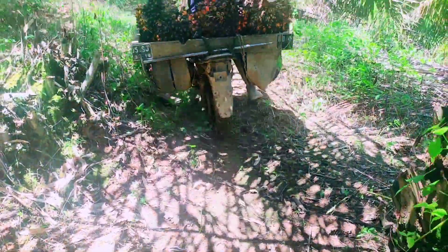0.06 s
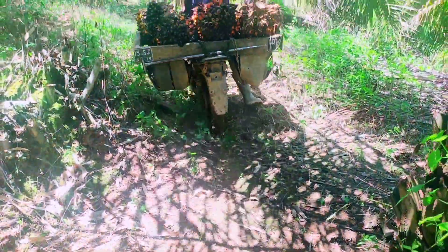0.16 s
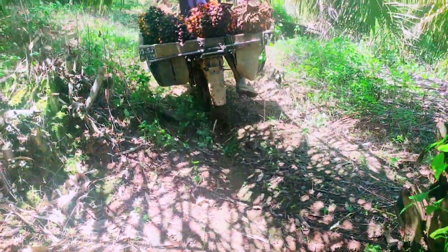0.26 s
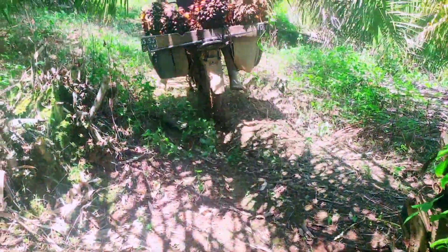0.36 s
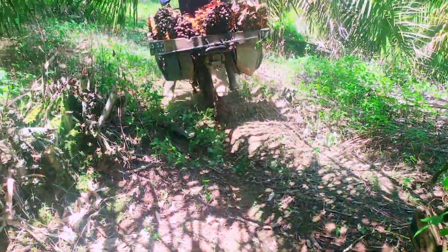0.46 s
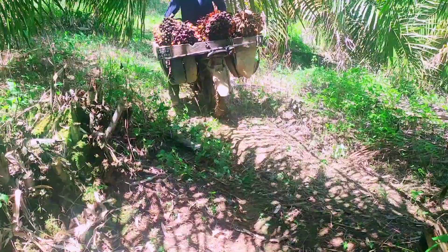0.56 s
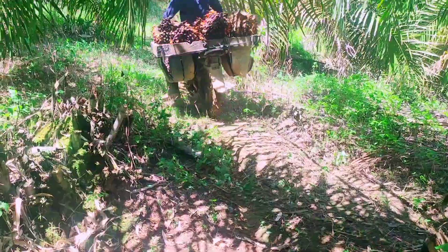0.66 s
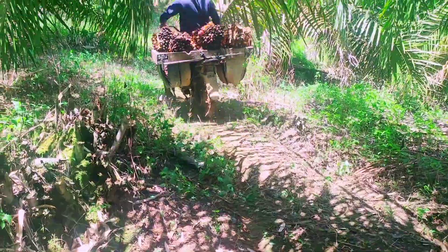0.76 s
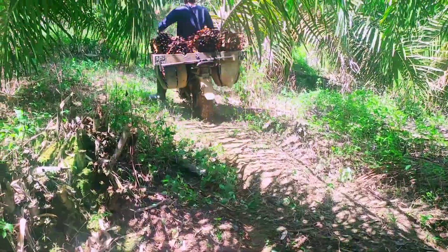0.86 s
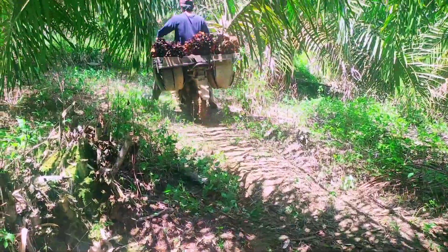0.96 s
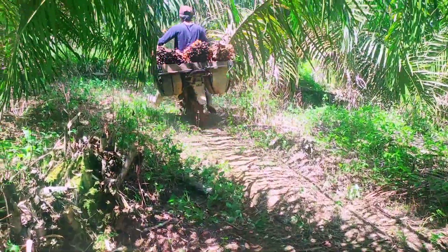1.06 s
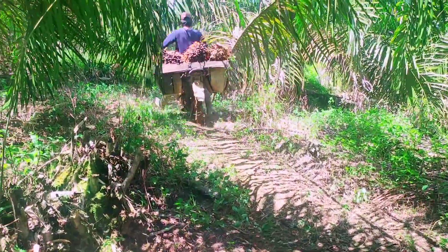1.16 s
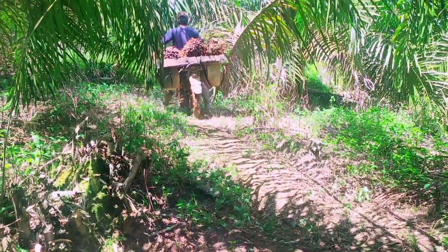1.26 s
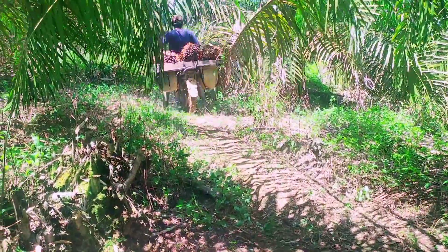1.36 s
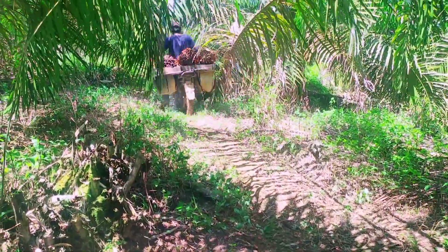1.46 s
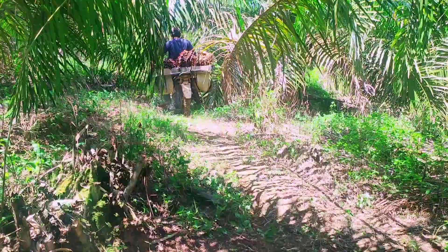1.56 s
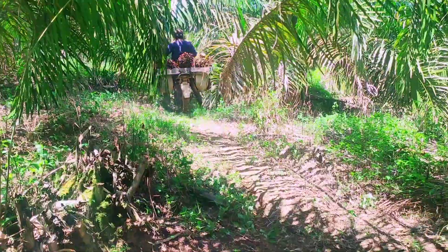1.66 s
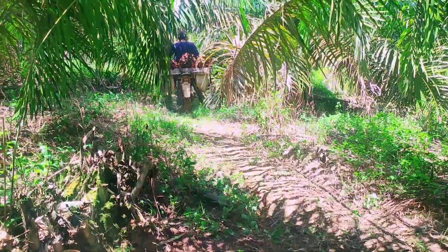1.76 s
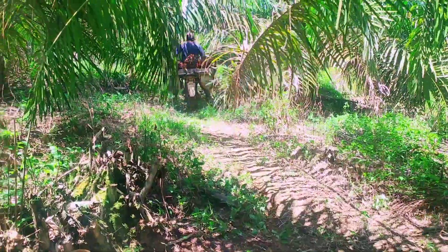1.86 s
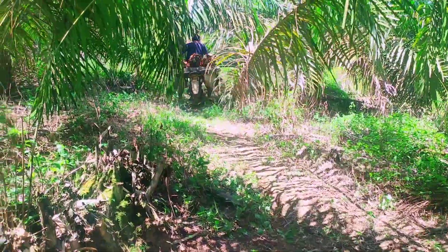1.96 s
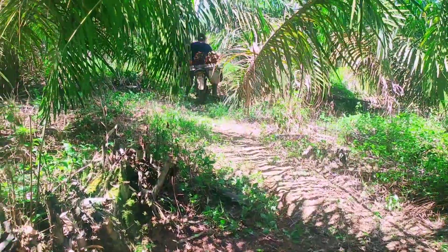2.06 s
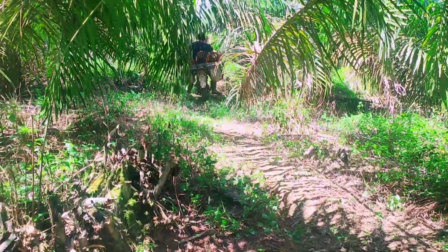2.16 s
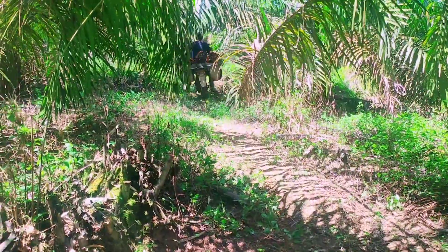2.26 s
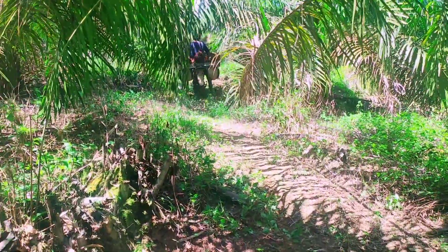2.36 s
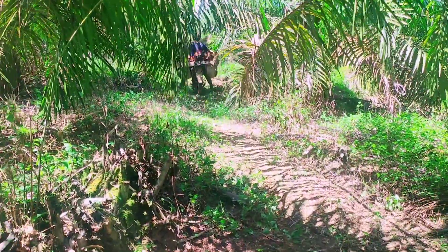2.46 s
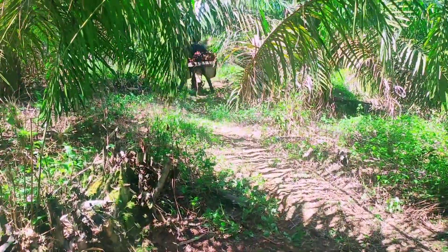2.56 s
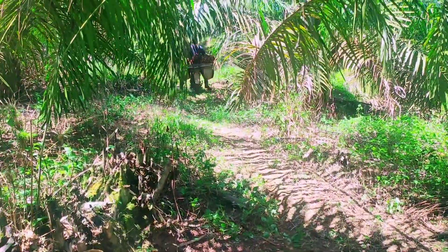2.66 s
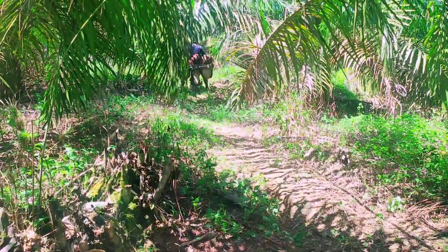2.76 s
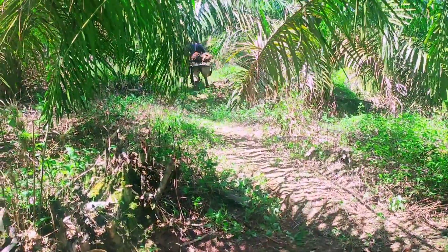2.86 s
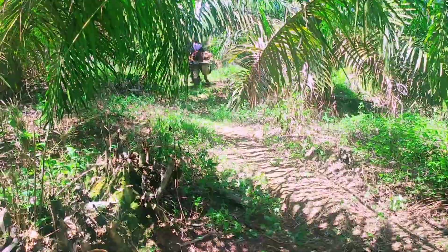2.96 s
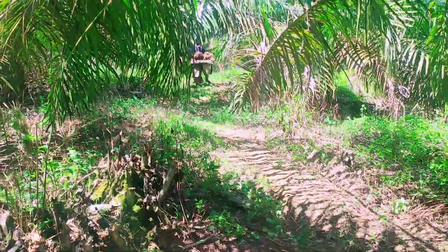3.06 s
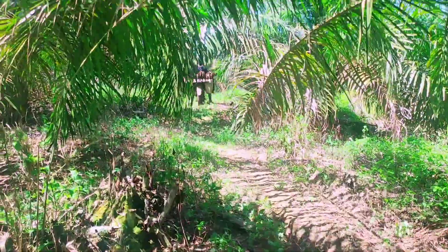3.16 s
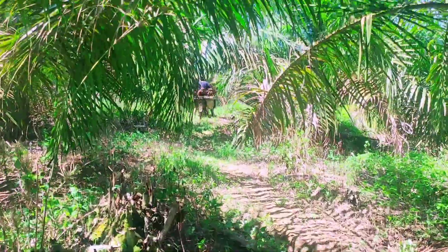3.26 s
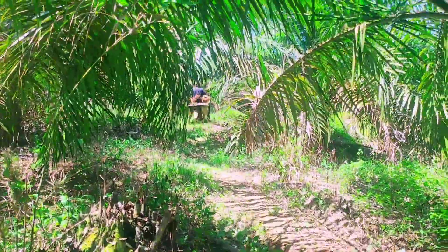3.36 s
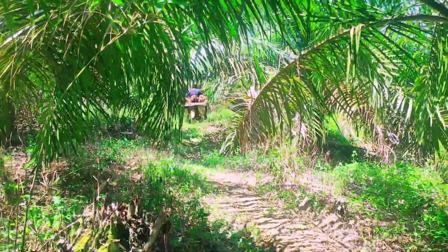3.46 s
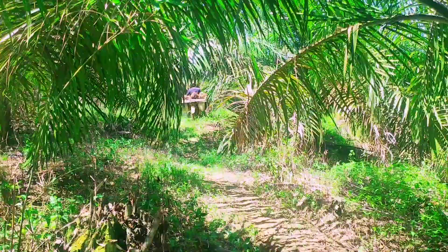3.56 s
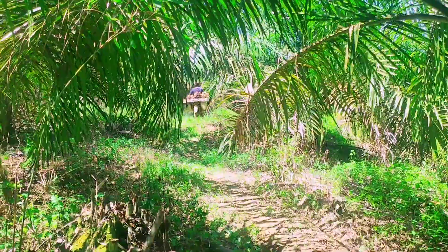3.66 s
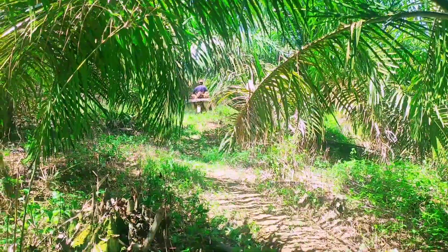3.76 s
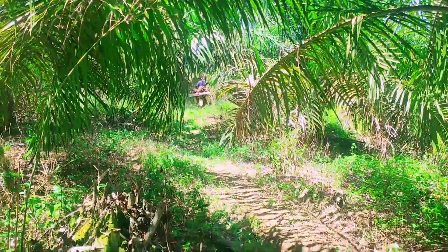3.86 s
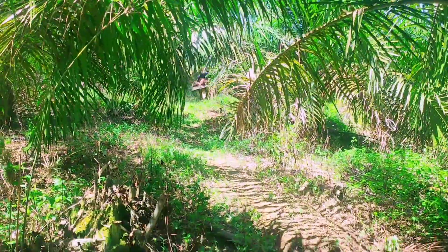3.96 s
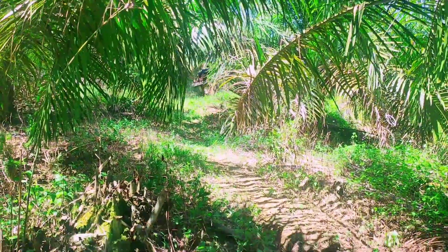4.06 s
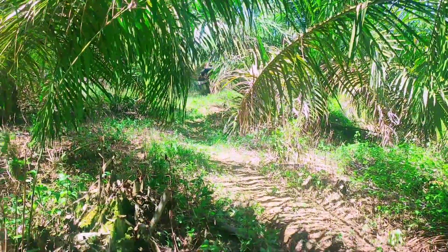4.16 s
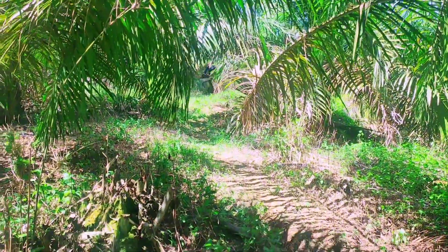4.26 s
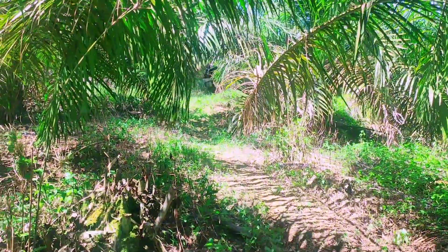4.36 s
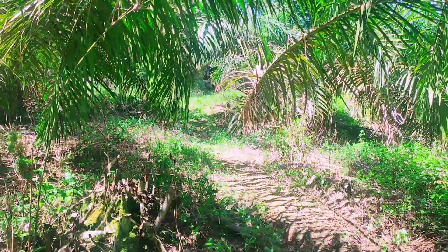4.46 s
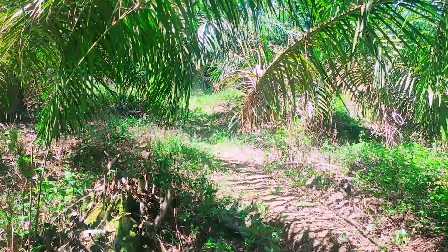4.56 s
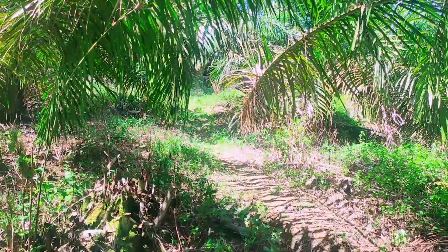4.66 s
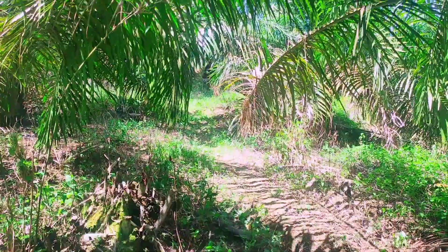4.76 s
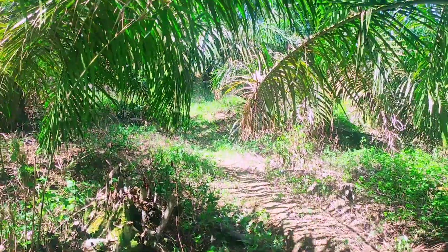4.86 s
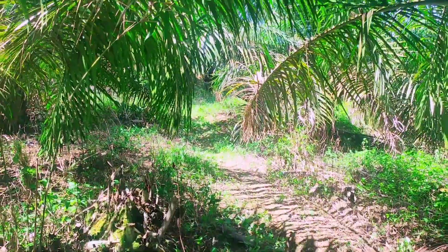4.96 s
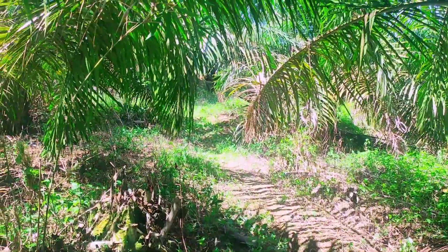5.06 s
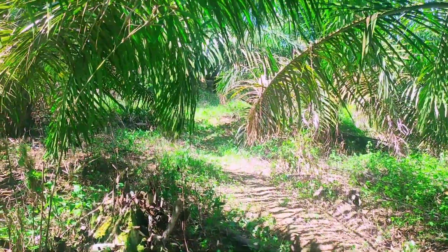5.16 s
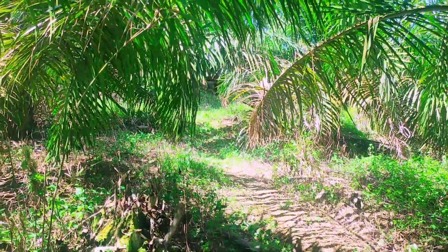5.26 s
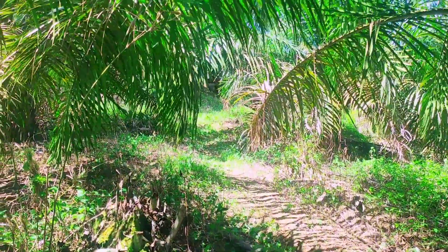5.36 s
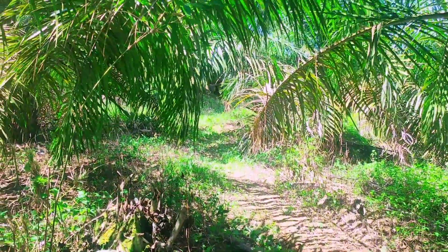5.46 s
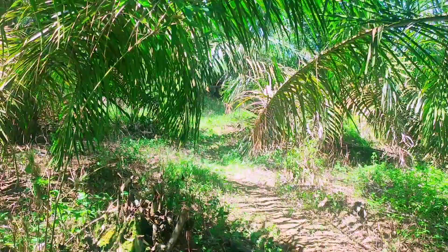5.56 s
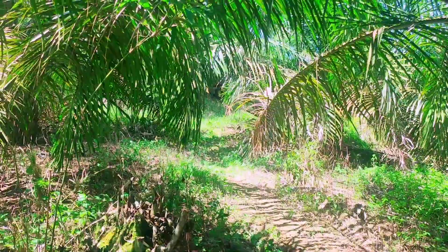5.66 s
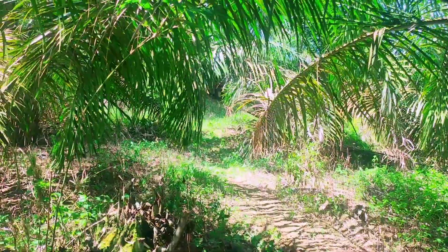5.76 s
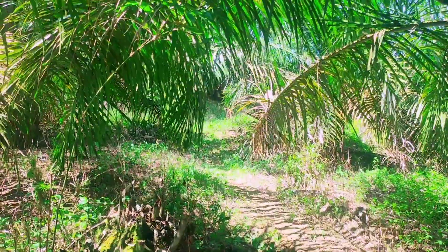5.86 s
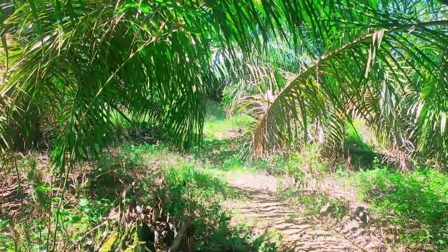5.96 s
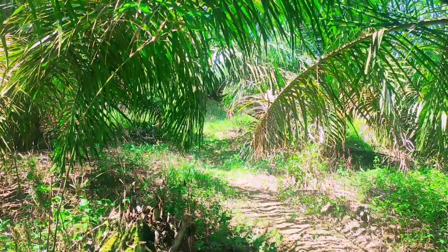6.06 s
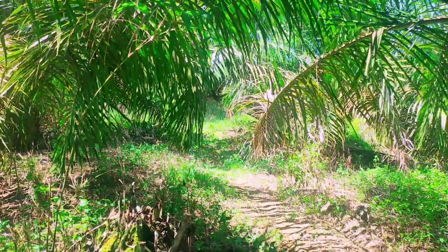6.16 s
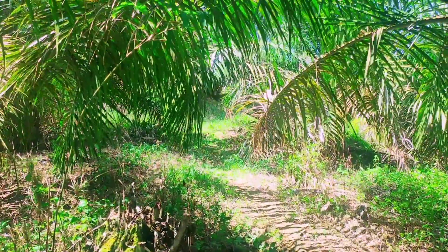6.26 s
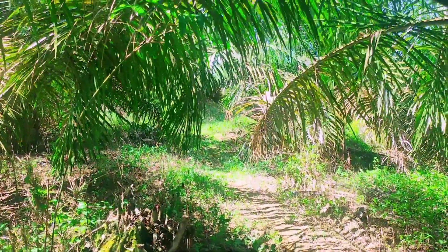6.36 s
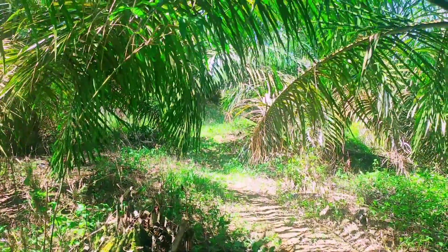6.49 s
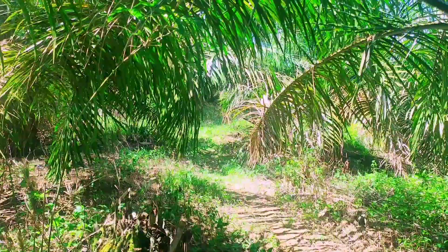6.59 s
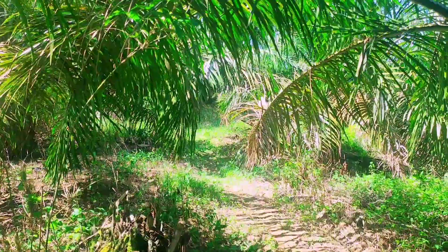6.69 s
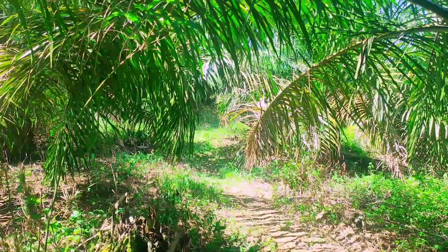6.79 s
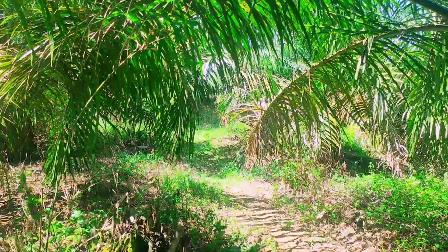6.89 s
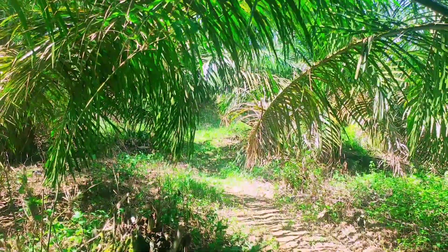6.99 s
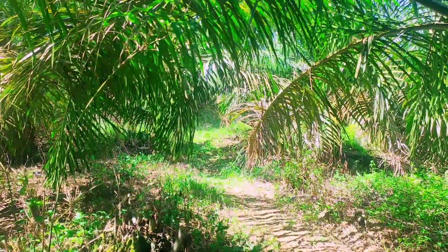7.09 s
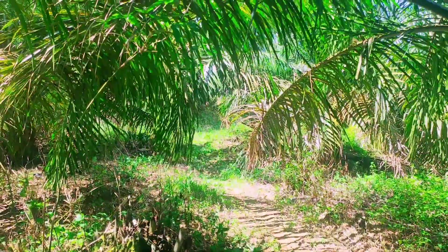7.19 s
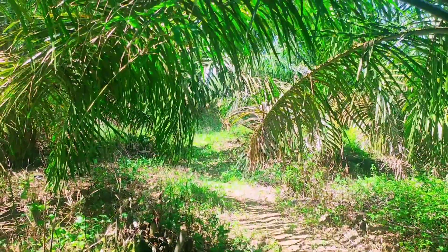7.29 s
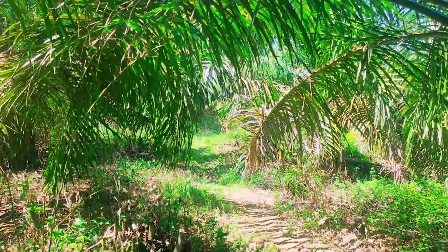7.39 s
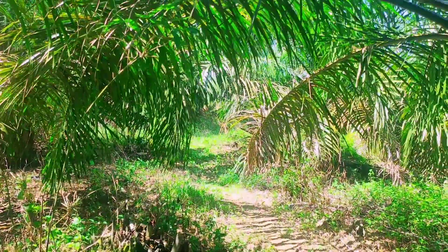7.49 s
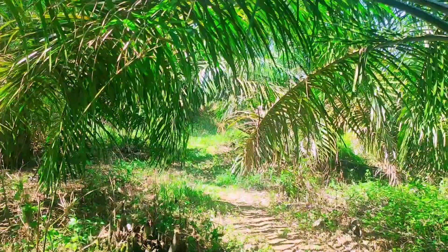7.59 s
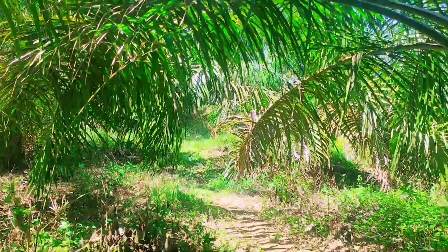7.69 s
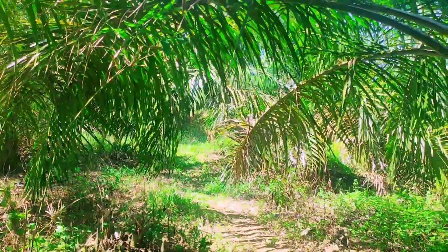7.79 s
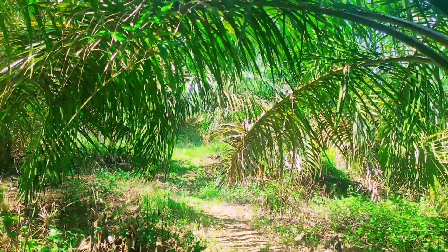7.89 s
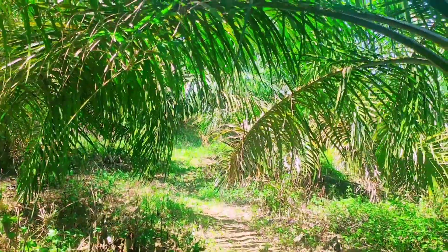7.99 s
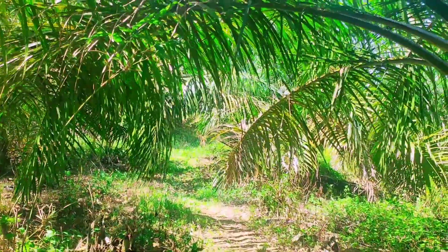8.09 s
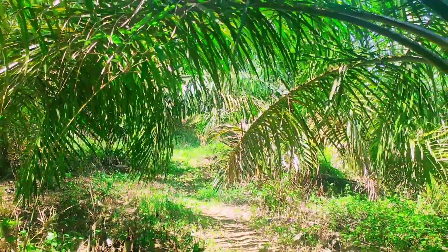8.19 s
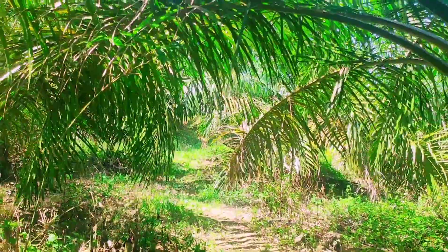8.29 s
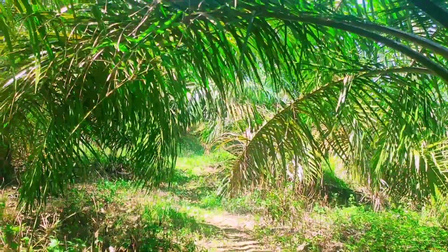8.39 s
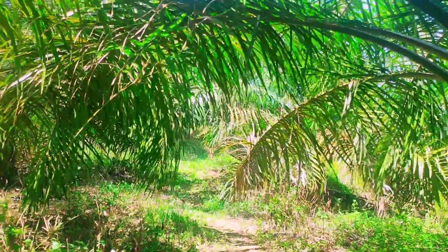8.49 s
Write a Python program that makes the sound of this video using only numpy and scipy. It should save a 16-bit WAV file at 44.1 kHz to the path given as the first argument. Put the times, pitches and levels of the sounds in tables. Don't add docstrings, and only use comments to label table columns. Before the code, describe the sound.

Outdoors on a dirt track among palms, a small, badly silenced single-cylinder petrol engine drives a loaded carrier away from a phone. From 0 to 1 second it is close and loudest: rapid, lumpy exhaust pops, roughly thirty a second, stumbling in uneven runs, with a raspy crack, spitting gas hiss and loose metallic rattle. From 1 to 2 seconds it drops back. Around 2 to 4 seconds the hollow pipe tone climbs under load, more ringing and nasal, with brief dull throttle lifts and short trunk echoes. It is weakest near 3.4 to 4.3, swells a little around 4.5 to 5, dips at 5.3, then settles into a lower, steadier putter, losing its hiss. At 7.94 a quick cluster of dull wooden knocks bumps through. By 8.5 the engine is faint but still running. Low breeze and faint frond rustle remain underneath.

```python
import sys
import numpy as np
from scipy import signal
from scipy.fft import rfft, irfft, next_fast_len
from scipy.io import wavfile
from scipy.ndimage import uniform_filter1d

SR = 44100
rng = np.random.default_rng(int(sys.argv[2]) if len(sys.argv) > 2 else 0)


def wav_record(signal):
    frames = np.transpose(np.atleast_2d(signal))
    bounded = np.clip(frames, -1, 1)
    quanta = np.round(bounded * 32767).astype(np.int16)
    wavfile.write(sys.argv[1], SR, quanta)


def natural_amplitude(level_db):
    exponent = np.asarray(level_db, float) / 20
    return 10 ** exponent


N = 376173


def evened(x):
    return x / np.sqrt(np.mean(x ** 2) + 1e-20)


def read(points, hz):
    point_hz, value = np.transpose(points)
    return np.interp(np.log(hz + 1), np.log(point_hz + 1), value)


def follow(rows, s):
    at, *columns = np.transpose(rows)
    return [np.interp(s, at, column) for column in columns]


def add(mix, s, sound):
    part = mix[round(s * SR):][:len(sound)]
    part += sound[:len(part)]


# frequency_hz, likeness
PORT_LIKENESS = [(60, 0.79), (160, 0.77), (430, 1), (1160, 0.34), (3100, 0.28), (8300, 0.01)]


def noise(colour, patchy_db, alike):
    frames, hz = N // 128 + 5, np.fft.rfftfreq(512, 1 / SR)
    a, b, c, d, patches = rng.standard_normal((frames, 257, 5)).T
    patches = uniform_filter1d(patches, size=8, axis=0)
    patches = evened(uniform_filter1d(patches, size=12, axis=1))
    same = np.clip(alike * read(PORT_LIKENESS, hz), -1, 1)[:, None]
    left, other = a + 1j * b, c + 1j * d
    z = np.array([left, same * left + np.sqrt(1 - same ** 2) * other])
    z *= natural_amplitude(read(colour, hz)[:, None] + patchy_db * patches)
    return evened(signal.istft(z, nperseg=512, noverlap=384)[1][:, :N])


# time_s, rattle_db, rasp_db
DEPARTURE = [(0.0, -43, -4.5), (0.43, -37, 3.5), (0.97, -43.5, 6), (1.64, -42.5, -0.8), (1.78, -47, -3.5),
             (2.04, -41, 1), (2.9, -41.5, -2), (3.5, -47.5, -6.5), (3.87, -50, -4), (4.59, -46, -0.5),
             (5.06, -47.5, -3), (5.2, -51.5, 0.5), (5.33, -68, 4), (5.4, -49.5, -1.5), (5.91, -49, 4.5),
             (6.7, -53, -8), (7.86, -52.5, -3), (8.53, -57.5, -0.5)]
# frequency_hz, density_db
RATTLE_COLOUR = [(290, -28), (500, -7.5), (651, -8.5), (888, -14), (1060, -19), (1290, -30), (1820, -22),
                 (4470, -29.5), (6640, -17), (7760, -22.5), (8750, -72), (11400, -104), (19200, -120)]
# frequency_hz, density_db
RUMBLE_COLOUR = [(15, -73.5), (25, -30), (59, -36), (189, 7.5), (328, -21.5), (405, -15), (648, -28),
                 (897, -31), (1200, -55.5), (1560, -66), (2640, -120)]
# frequency_hz, density_db
LEAF_COLOUR = [(760, -34), (1300, -5), (1800, -2), (3470, -14), (6560, -8.5), (7600, -20), (9880, -50),
               (16700, -120)]


def rattle():
    t = np.arange(N) / SR
    rumble = natural_amplitude(-38) * noise(RUMBLE_COLOUR, patchy_db=3.0, alike=1.18)
    fizz = noise(RATTLE_COLOUR, patchy_db=4.0, alike=1.1)
    low = signal.sosfiltfilt(signal.butter(4, 6900, fs=SR, output="sos"), fizz)
    fizz = low + natural_amplitude(3.0 - 1.02 * t) * (fizz - low)
    leaves = natural_amplitude(-71.5) * noise(LEAF_COLOUR, patchy_db=1.0, alike=0.8)
    return natural_amplitude(follow(DEPARTURE, t)[0]) * fizz + rumble + leaves


# frequency_hz, density_db
WIND_COLOUR = [(15, -1.5), (30, -4), (62, 5), (100, 6.5), (160, 0), (300, -41), (900, -110)]
# time_s, level_db
BREEZE_LEVEL = [(0, 5.5), (1.2, 1.5), (3.2, -7.5), (4.9, -2), (6, 1), (7.2, -3.5), (8.5, -5)]


def air():
    level = natural_amplitude(-47.6 + follow(BREEZE_LEVEL, np.arange(N) / SR)[0])
    return level * noise(WIND_COLOUR, patchy_db=1.5, alike=1.05)


# first_s, last_s, count, blow_db,
# sharpness_db
FIRING_RUNS = [(0.0068, 0.0239, 2, -7, -2), (0.0535, 0.0831, 2, -4, -1.5), (0.1087, 0.1661, 3, -3, 0),
               (0.2004, 0.2216, 2, -4.5, 1.5), (0.2547, 0.2873, 2, -2.5, -2.2),
               (0.3082, 0.3291, 2, -6.0, 0.7), (0.3635, 0.4048, 3, -3.5, 2.2),
               (0.4459, 0.482, 2, -4, -2), (0.5038, 0.5462, 3, -3, 0.2), (0.588, 0.6085, 2, -5.5, 6),
               (0.6431, 0.6791, 2, -6, -1.3), (0.7, 0.7345, 2, -5.5, -2),
               (0.7563, 0.7905, 2, -7.5, -0.8), (0.8293, 0.8626, 2, -8.5, 0.7),
               (0.888, 0.9193, 2, -8.5, -0.5), (0.9556, 1.0058, 3, -10.5, -2.0),
               (1.0348, 1.0564, 2, -10, 2.2), (1.1003, 1.1299, 2, -10, -1),
               (1.1682, 1.2221, 2, -9.5, -2.2), (1.2522, 1.2838, 2, -9.5, 2.3),
               (1.3035, 1.3416, 2, -8.5, 6.5), (1.3825, 1.4663, 3, -8.5, 1.7),
               (1.4985, 1.5626, 4, -9, -0.3), (1.5973, 1.6194, 2, -7.5, 4.5),
               (1.6583, 1.6893, 2, -8.5, -3), (1.7321, 1.7755, 3, -10.5, -0.6),
               (1.797, 1.8288, 2, -8.5, 0.5), (1.8696, 1.9119, 2, -13.5, -1),
               (1.966, 1.9839, 2, -12.5, 2.8), (2.0016, 2.036, 2, -12, 3),
               (2.0534, 2.0752, 2, -12, 3.5), (2.0967, 2.1313, 2, -11, -4.3),
               (2.1699, 2.1914, 2, -11, -0.5),
               (2.2235, 2.2598, 2, -10.3, 1), (2.2856, 2.3166, 2, -11, -0.8),
                 (2.358, 2.3794, 2, -10.5, -1.0), (2.401, 2.434, 2, -13, 1.7),
                 (2.4717, 2.4987, 2, -12.5, 0.1), (2.5342, 2.5595, 2, -13, -1),
                 (2.5847, 2.6707, 4, -13.5, 4.2), (2.6945, 2.7774, 4, -13.5, 0.6),
                 (2.7944, 2.852, 3, -11, 1.5), (2.8693, 2.8984, 2, -10.5, 0),
                 (2.9325, 2.9635, 2, -11, -2.5), (3.0002, 3.0267, 2, -13, -0.9),
                 (3.0575, 3.075, 2, -11.5, 7), (3.1044, 3.1394, 2, -11.5, -1),
                 (3.1638, 3.2102, 3, -12.5, 0.7), (3.2365, 3.266, 2, -12, 4.5), (3.289, 3.3647, 4, -14, 1),
                 (3.3815, 3.4065, 2, -17.5, 8), (3.4294, 3.457, 2, -15.5, 2.5),
                 (3.4903, 3.518, 2, -14, 6.5), (3.5473, 3.5643, 2, -14.5, 7), (3.5936, 3.6295, 3, -17, 2),
                 (3.6512, 3.7058, 3, -16.5, -0.5), (3.7406, 3.7624, 2, -16, 2.3),
                 (3.7904, 3.8177, 2, -17.7, 0.8), (3.8526, 3.8885, 2, -16.5, 7), (3.911, 3.944, 2, -16, 2),
                 (3.965, 3.9808, 2, -15, 2.5), (4.0079, 4.0443, 2, -14.5, -2.5),
                 (4.0712, 4.106, 2, -14.5, 6.3), (4.1412, 4.1713, 2, -12.5, -1.3),
                 (4.2078, 4.2407, 2, -16, 0), (4.2539, 4.2876, 2, -19, 8),
               (4.3028, 4.3203, 2, -14.0, 5.2), (4.34, 4.34, 1, -14.0, 2.2),
                 (4.369, 4.4176, 3, -16.5, -1), (4.441, 4.527, 4, -11.5, -3.5), (4.5488, 4.5708, 2, -11, 2),
                 (4.6058, 4.663, 3, -10, 0.3), (4.6948, 4.7168, 2, -12, 4.5), (4.7344, 4.761, 2, -12, 3.5),
                 (4.7844, 4.8115, 2, -12, -1.5), (4.8372, 4.8694, 2, -12, 1.5),
                 (4.9049, 4.9638, 3, -9.5, 0.7), (4.9808, 5.0111, 2, -9, 1.5), (5.054, 5.1028, 2, -9, -2.2),
                 (5.1247, 5.1692, 3, -9.5, -1.3), (5.1982, 5.241, 2, -12.5, 1), (5.27, 5.305, 2, -19.5, 0),
                 (5.3334, 5.3699, 2, -13, -3.9), (5.3925, 5.4257, 2, -11, 0), (5.447, 5.501, 3, -10.5, 2.8),
                 (5.526, 5.5566, 2, -9.5, -4.5), (5.5789, 5.6004, 2, -14, 1.7),
                 (5.6317, 5.6869, 3, -12, -0.5), (5.7235, 5.7441, 2, -12, 2.5), (5.795, 5.878, 4, -10.5, 1),
                 (5.9103, 5.9602, 2, -9.5, 1.6), (5.982, 6.0269, 3, -10.5, 1.5),
                 (6.049, 6.1073, 3, -11, 2.3), (6.1414, 6.165, 2, -11.5, 3.5),
                 (6.1887, 6.2194, 2, -12, -0.2), (6.255, 6.2984, 3, -12.0, -1.9),
                 (6.3322, 6.3613, 2, -10.5, 0.8), (6.3982, 6.4201, 2, -10.8, -2),
                 (6.4422, 6.469, 2, -11, 0), (6.5123, 6.5539, 3, -12.5, 1.2),
               (6.582, 6.61, 2, -11.5, -1.5), (6.6534, 6.7043, 3, -11, -0.7),
                 (6.7416, 6.7921, 3, -12.0, -3.1), (6.8214, 6.859, 2, -12.5, 2),
                 (6.8882, 6.9172, 2, -11.5, -0.5), (6.954, 6.9758, 2, -11, -3),
                 (7.0044, 7.0345, 2, -11.5, -1.2), (7.072, 7.102, 2, -11, -1.5),
                 (7.1392, 7.1607, 2, -14, -5.5), (7.1899, 7.2149, 2, -10, -3), (7.2453, 7.2772, 2, -13, -3),
                 (7.2955, 7.364, 3, -12, -3.5), (7.3922, 7.41, 2, -15.8, -1),
                 (7.4434, 7.4745, 2, -12, -1.5), (7.5131, 7.5314, 2, -12, -1.5),
                 (7.5606, 7.5921, 2, -12.5, 0), (7.6306, 7.6952, 3, -12, -3.3),
                 (7.7133, 7.7508, 2, -13.5, -1), (7.7783, 7.812, 2, -13, -4), (7.8345, 7.8642, 2, -13, -2),
                 (7.9047, 7.928, 2, -15, -3.5), (7.9473, 7.9732, 2, -19, 0.5), (7.998, 8.0148, 2, -13, 1),
                 (8.0471, 8.0868, 2, -15.9, -6.5), (8.1231, 8.1475, 2, -16.5, -1),
                 (8.1836, 8.211, 2, -17.5, -2.5), (8.2434, 8.3195, 3, -18, -2.2),
                 (8.3487, 8.3802, 2, -16.5, -6.5), (8.4103, 8.424, 2, -21.5, -2.5),
                 (8.463, 8.5114, 2, -20, 2)]
# start_s, end_s, dulling_db, blow_change_db
THROTTLE_LIFTS = [(0.015, 0.04, -7.5, 4.5), (0.30, 0.34, -2.5, 0), (1.68, 1.71, -20.5, 3),
                  (3.01, 3.2, -3, -1), (3.255, 3.275, -13, -2.5), (3.37, 3.415, -12.5, 2.5),
                  (0.395, 0.41, -1.5, -0.5), (3.72, 3.845, -16, 7.5), (3.86, 3.995, -17, 5.5),
                  (4.245, 4.295, -12.5, 2), (4.795, 4.85, -1, -7), (5.18, 5.21, -4, -0.5),
                  (5.22, 5.32, -14, -7.5), (7.96, 7.985, -10, 1), (8.005, 8.03, -8.5, 0),
                  (0.6, 0.62, -6, -0.5), (0.69, 0.71, -6, 0), (1.295, 1.31, -16, -1.5),
                  (5.59, 5.61, -4.5, 0.5), (5.735, 5.75, -4.5, 3.5), (6.1, 6.115, -2.5, -0.5),
                  (6.54, 6.56, -7, 0.5), (0.88, 0.9, -6, -2.5), (0.97, 1.01, -2, -1),
                  (1.335, 1.35, -5, -1.5), (1.79, 1.805, -5, -1.5), (1.995, 2.025, -5, -2.5),
                  (2.07, 2.085, -4, -1.5), (5.57, 5.59, -4, -1.5), (8.08, 8.095, -6, -3)]
# time_s, pipe_hz, pipe_t60_ms, front_hz, front_against_ring_db
PIPE_STATE = [(0.36, 186, 24.7, 714, -0.5), (1.07, 173.4, 38.6, 715, 4), (1.6, 190, 25, 688, 1),
              (2.1, 195.3, 56, 736, 4.5), (2.7, 209.6, 56, 776, 7), (2.95, 211, 63, 810, 5.5),
              (3.35, 232, 69, 740, 4), (3.5, 218, 51, 656, 0.5), (3.9, 208, 60, 627, 1.5),
              (4.2, 214, 60, 590, -2), (4.45, 204, 35, 623, 3.5), (4.75, 222, 43, 645, -0.5),
              (5.33, 175.3, 35, 690, 0), (6.04, 168.3, 49, 680, -6), (6.75, 168.6, 54, 674, -5.5),
              (7.46, 178, 47, 735, -9), (8.17, 170, 46, 600, -18)]


def firings():
    rows = []
    for first, last, count, *strength in FIRING_RUNS:
        rows += [(at, *strength) for at in np.linspace(first, last, round(count))]
    s, blow_db, sharp_db = np.transpose(rows)
    refill_ms = 24.06
    early_ms = np.maximum(refill_ms - 1000 * np.diff(s, prepend=-1), 0)
    chance = rng.standard_normal((len(s), 2))
    dull_db = sharp_db - 1.0 * early_ms - 0.5 * chance[:, 0] ** 2
    blow_db = blow_db - 0.16 * early_ms + 0.5 * chance[:, 1]
    for start, end, lift_db, change_db in THROTTLE_LIFTS:
        lifted = (s > start) & (s < end)
        dull_db = dull_db + lift_db * lifted
        blow_db = blow_db + change_db * lifted
    return s, blow_db, dull_db, dull_db + follow(PIPE_STATE, s)[-1]


# start_s, can_db, can_hz, tail_pipe_db, tail_pipe_hz, late_echo_share, twin_share
TRACK_HEADINGS = [(0, -9, 284, -22.5, 942, -0.031, 0.04), (0.8, -9, 280, -17.5, 941, 0.0033, 0.05),
                  (1.45, -15.5, 379.4, -15, 930, 0.07, 0.12), (2.3, -17.5, 390, -11, 908, 0.092, 0.21),
                  (2.97, -15.5, 410, -19, 915, 0.1, 0.22), (3.4, -16, 382, -19.5, 844, 0.055, 0.22),
                  (4.0, -16, 397, -18, 840, 0.041, 0.32), (4.85, -18, 398, -19, 838, 0.021, 0.31),
                  (5.25, -11.5, 269.4, -28, 1066, -0.047, 0.12), (6.2, -14, 267, -25.5, 1098, -0.081, 0.12),
                  (7.3, -17, 275, -22.5, 1057, -0.072, 0.13)]


def heading_at(s):
    return [row for row in TRACK_HEADINGS if row[0] <= s][-1][1:]


def nearness(s):
    return np.exp(-(s / 1.96) ** 4)


# time_s, ring_time_ratio
RING_LINGER = [(0.166, 0.65), (1.074, 1.4), (1.252, 0.65), (1.466, 0.5), (1.87, 1.4), (1.912, 1.4),
               (2.317, 1.6), (2.434, 1.3), (2.534, 0.65), (2.559, 0.6), (3.6, 1.4), (4.418, 1.5),
               (4.963, 1.4), (5.851, 0.65), (5.91, 1.5), (6.704, 0.7), (7.139, 0.6), (7.296, 1.4)]
# start_s, end_s, pitch_ratio, depth
CANCELLATIONS = [
    (1.9, 2.97, 1.46, 0.46),
    (2.97, 3.4, 1.35, 0.7),
    (3.4, 4.0, 1.44, 0.7),
    (4.0, 4.85, 1.55, 0.5),
    (4.85, 5.25, 1.8, 0.5),
]


def resonances(s, dull_db, bite_db, chance):
    t = np.arange(2100) / SR
    a, b, c = chance
    pipe_hz, t60_ms, front_hz, _ = follow(PIPE_STATE, s)
    can_db, can_hz, _, _, _, twin = heading_at(s)
    t60_ms = t60_ms * np.prod([ratio for at, ratio in RING_LINGER if abs(s - at) < 0.013])
    t60_ms = t60_ms * (1 + 0.0089 * dull_db) * np.exp(0.07 * b)
    sag = 1 + 0.0069 * dull_db + 0.003 * a
    ring = np.cos(2 * np.pi * pipe_hz * sag * t)
    ring += twin * np.cos(2 * np.pi * 1.147 * pipe_hz * t)
    pop = natural_amplitude(-60e3 * t / t60_ms) * ring
    pop += natural_amplitude(bite_db - 3.2 - 60 * t / 0.016) * np.sin(2 * np.pi * front_hz * (1 + 0.03 * a) * t)
    pop += natural_amplitude(can_db + 1.5 * c - 60 * t / 0.078) * np.cos(2 * np.pi * can_hz * sag * t)
    for start, end, ratio, depth in CANCELLATIONS:
        if start <= s < end:
            pop = pop - depth * signal.lfilter(*signal.iirpeak(ratio * pipe_hz, 5.0, SR), pop)
    return pop


def radiated(pop, s, dull_db, bite_chance, pitch_chance):
    t, lag = np.arange(2100) / SR, np.arange(-150, 151) / SR
    near = nearness(s)
    notch_hz = 1239 - 32 * s
    opening_s = 0.00012 * (1 + 0.3 * max(-dull_db, 0))
    opening_s += 0.000045 * near
    mouth = np.clip((0.5 / notch_hz - abs(lag)) * SR + 0.5, 0, 1)
    valve = np.convolve(mouth, np.exp(-0.5 * (lag / opening_s) ** 2), "same")
    pop = signal.fftconvolve(pop, valve / valve.sum())
    _, _, tail_db, tail_hz, _, _ = heading_at(s)
    tail = natural_amplitude(tail_db + 0.51 * dull_db - 60 * t / 0.027) * np.sin(2 * np.pi * tail_hz * t)
    add(pop, -lag[0], tail)
    crack_db = -21.5 - 1.8 * near + follow(DEPARTURE, s)[1] + 1.2 * dull_db + 3 * bite_chance
    crack = np.sin(2 * np.pi * 1540 * (1 + 0.1 * pitch_chance) * t)
    add(pop, -lag[0], natural_amplitude(crack_db - 60 * t / 0.0044) * crack)
    return pop, -lag[0]


ECHO_DELAYS = (1.0, 1.6, 6.0, 12.5)
# start_s, end_s, added_share
BED_SWINGS = [(0, 0.12, 0.42), (0.13, 0.18, -0.15), (0.19, 0.23, 0.2), (0.24, 0.27, -0.23),
              (0.3, 0.34, 0.45), (0.38, 0.42, 0.19), (0.43, 0.46, -0.15), (0.5, 0.56, 0.15),
              (0.6, 0.62, 0.3), (0.69, 0.71, 0.3), (7.52, 7.54, 0.3), (7.69, 7.72, 0.31), (7.8, 7.85, 0.13),
              (7.9, 7.94, 0.25), (8.08, 8.1, 0.22), (8.17, 8.19, 0.16)]
# time_s, share
AFTERBURNS = [
    (5.011, 0.4),
    (5.054, 0.3),
    (4.007, 0.15),
    (4.106, 0.15),
]


def exhaust(fired):
    out = np.zeros(N)
    spread = rng.standard_normal((len(fired[0]), 3))
    for s, blow_db, dull_db, bite_db, chance in zip(*fired, spread):
        pop = resonances(s, dull_db, bite_db, chance)
        pop, lead_s = radiated(pop, s, dull_db, chance[0], chance[2])
        near = nearness(s)
        guard = 0.57 * near
        ground = 0.097 + 0.37 * np.tanh(s / 2.46) ** 2
        bed = 0.14 * near + sum(more for start, end, more in BED_SWINGS if start < s < end)
        late = heading_at(s)[4]
        again = sum(share for at, share in AFTERBURNS if abs(s - at) < 0.005)
        for share, ms in zip((1, guard, ground, bed, late, again), (0, *ECHO_DELAYS, 10.3)):
            add(out, max(s + ms / 1000 - lead_s, 0), natural_amplitude(blow_db) * share * pop)
    return signal.filtfilt(*signal.butter(2, 75, "high", fs=SR), out)


# frequency_hz, density_db
PUFF_COLOUR = [(740, -17.5), (1250, -8), (1440, -2.5), (2160, -8.5), (2820, -9), (4070, -9), (4670, -14.5),
               (6740, 1.5), (7680, -10.5), (8750, -33.5), (11400, -81), (19200, -120)]
# top_hz, level_db, chance_db, change_db_per_s
SPIT_BANDS = [
    (2300, 1, 2.0, 0.0),
    (3420, 2, 4.5, -0.3),
    (5130, 0.2, 4.5, -0.28),
    (7300, 0.3, 2.5, -0.5),
    (12000, 2, 2.5, -0.92),
]


def puffs(fired):
    s, blow_db, _, bite_db = fired
    t, out, below = np.arange(3000) / SR, np.zeros((2, N)), 0
    chance = rng.standard_normal((len(s), 1 + len(SPIT_BANDS)))
    force_db = blow_db + 0.38 * bite_db - 18 + 1.93 * chance[:, 0]
    spit_and_wheeze = np.exp(-t / 0.0019) + 0.12 * np.exp(-t / 0.016)
    gate = (1 - np.exp(-t / 0.00083)) * spit_and_wheeze
    gas = noise(PUFF_COLOUR, patchy_db=2.0, alike=2.4)
    for k, (hz, db, chance_db, change_db) in enumerate(SPIT_BANDS):
        low = signal.sosfiltfilt(signal.butter(2, hz, fs=SR, output="sos"), gas)
        rasp_db = follow(DEPARTURE, s)[1] if k == 0 else 0
        train = np.zeros(N)
        train[(s * SR).astype(int)] = natural_amplitude(force_db + rasp_db + db + chance_db * chance[:, k + 1] + change_db * s)
        out += signal.oaconvolve(train, gate)[:N] * (low - below)
        below = low
    return out


# frequency_hz, t60_s
GROVE_DECAY = [(100, 0.21), (300, 0.095), (800, 0.07), (2000, 0.04), (8000, 0.2)]
# time_s, scatter_db
TRUNK_SCATTER = [(0, -23), (1, -9.5), (2.8, -17), (4.3, -10.5), (5.1, -17.5), (5.3, -26.5), (7.9, -30),
                 (8.5, -19)]


def grove(x):
    t, out = np.arange(N) / SR, np.zeros((2, N))
    for k in range(3):
        taps = np.zeros((2, SR // 2))
        jitter = rng.integers(0, 20, (2, (SR // 2 - 301) // 20))
        at = np.arange(300, SR // 2 - 20, 20) + jitter
        np.put_along_axis(taps, at, rng.choice([-1., 1.], at.shape), 1)
        taps[1] = 0.9 * taps[0] + 0.25 * taps[1]
        hz, lag, z = signal.stft(taps, SR, nperseg=512)
        decay = natural_amplitude(-60 * lag / read(GROVE_DECAY, hz)[:, None])
        tail = signal.istft(z * decay, SR, nperseg=512)[1]
        turn = np.sqrt(2 / 3) * np.cos(2 * np.pi * (0.616 * t + k / 3))
        out += signal.fftconvolve((x * turn)[None], tail / np.linalg.norm(tail[0]), axes=1)[:, :N]
    return natural_amplitude(follow(TRUNK_SCATTER, t)[0]) * out


# time_s, level_db
OVERLOADS = [
    (0.0497, -66),
    (0.1336, -64),
    (0.5272, -60),
    (0.7868, -70),
    (0.9198, -57.5),
    (2.058, -46.5),
    (2.1705, -55.5),
    (3.8432, -66),
    (5.8218, -64),
    (5.9557, -70.5),
]


def ticks():
    out, t = np.zeros(N), np.arange(200) / SR
    for (s, db), grit in zip(OVERLOADS, rng.standard_normal((len(OVERLOADS), 200))):
        add(out, s, natural_amplitude(db + 4.5 - 60 * t / 0.004) * grit)
    return signal.sosfilt(signal.butter(4, [8300, 12500], "band", fs=SR, output="sos"), out)


# start_s, level_db, pitch_hz
LOAD_KNOCKS = [
    (7.9372, -20.5, 299),
    (7.9443, -22.5, 320),
    (7.9552, -23.5, 290),
    (7.968, -32.5, 270),
    (7.983, -27.5, 220),
]


def jolts():
    out, t = np.zeros(N), np.arange(1500) / SR
    for s, db, hz in LOAD_KNOCKS:
        overtones = np.sin(2 * np.pi * 1.75 * hz * t) + 0.6 * np.sin(2 * np.pi * 2.6 * hz * t)
        wood = np.sin(2 * np.pi * hz * t) + natural_amplitude(-9.5 - 60 * t / 0.06) * overtones
        add(out, s, natural_amplitude(db - 60 * t / 0.038) * (1 - np.exp(-t / 0.0013)) * wood)
    return out


def scene():
    fired = firings()
    pops = exhaust(fired) + jolts()
    return pops + grove(pops) + puffs(fired) + rattle()


def roll_off(x):
    return signal.sosfilt(signal.butter(12, 8900, fs=SR, output="sos"), x)


# frequency_hz, left_minus_right_db
PORT_LEAN = [(170, -0.3), (270, 1.2), (580, -0.5), (1600, 5.5), (2660, 4.2), (3890, -0.7), (5680, 7),
             (7500, 1.2)]
# frequency_hz, lead_rad
PORT_LEAD = [(100, 0.03), (800, 0.3657), (1200, 0.3), (2200, -0.3), (3300, -2.15), (4500, -1), (5500, 1.8),
             (7000, -4)]


def record(dry):
    cut = signal.lfilter(*signal.butter(2, 90, "high", fs=SR), dry)
    size = next_fast_len(N)
    hz = np.fft.rfftfreq(size, 1 / SR)
    port = natural_amplitude(read(PORT_LEAN, hz) / 2) * np.exp(0.5j * read(PORT_LEAD, hz))
    edge_hz = 8100
    shelf_db = -50 / (1 + np.exp(np.clip((edge_hz + 150 - hz) / 130, -50, 50)))
    edge = natural_amplitude(shelf_db - np.maximum(hz - edge_hz, 0) / 300)
    edge /= np.sqrt(1 + (92 / (hz + 1)) ** 4)
    both = irfft(rfft(cut, size) * np.array([port, 1 / port]) * edge, size)[:, :N]
    return roll_off(both + air() + ticks())


dry = scene()
out = record(dry)
wav_record(out)
```